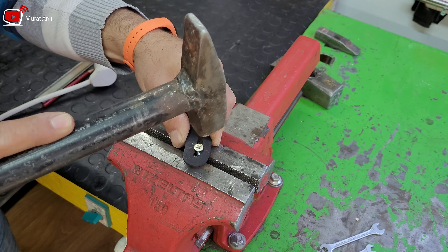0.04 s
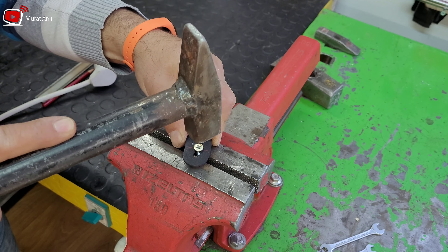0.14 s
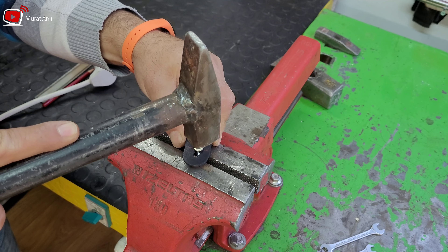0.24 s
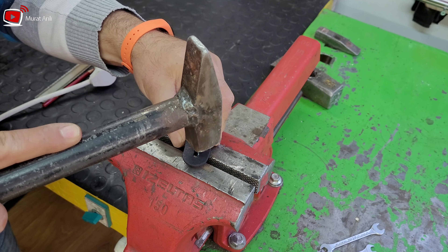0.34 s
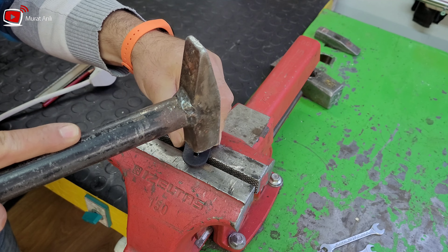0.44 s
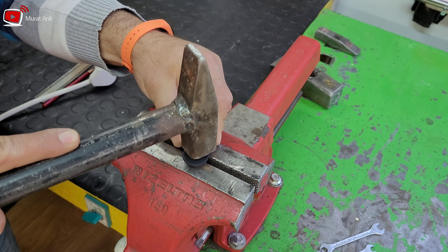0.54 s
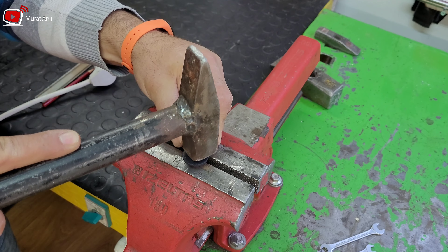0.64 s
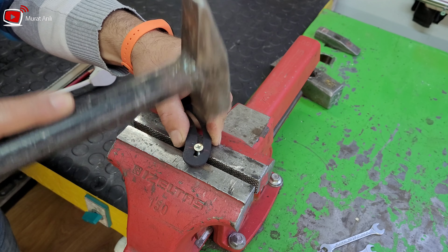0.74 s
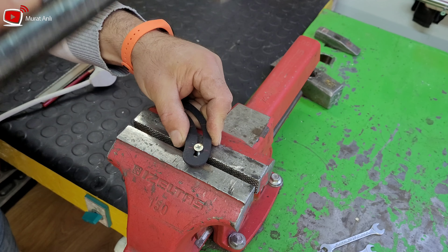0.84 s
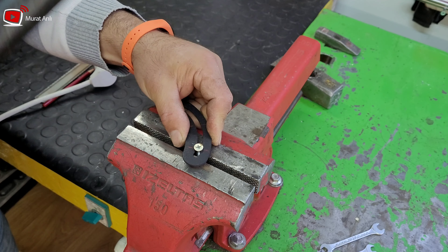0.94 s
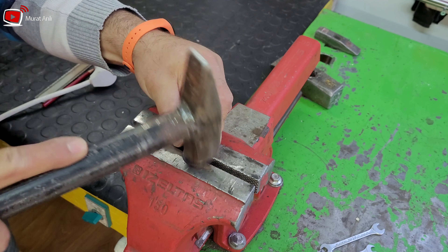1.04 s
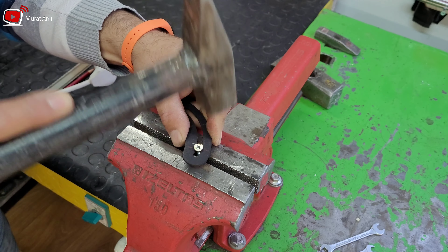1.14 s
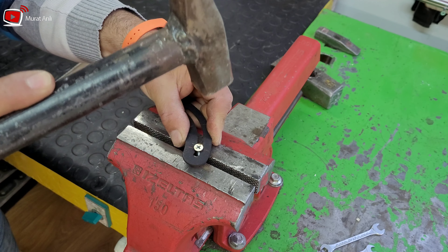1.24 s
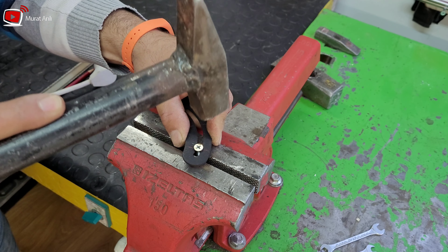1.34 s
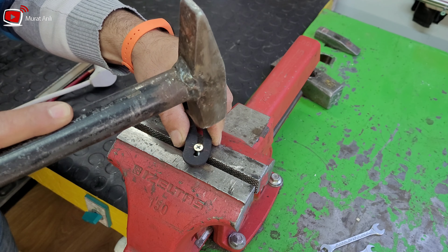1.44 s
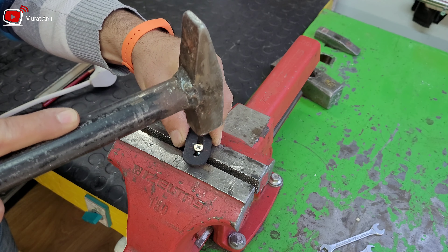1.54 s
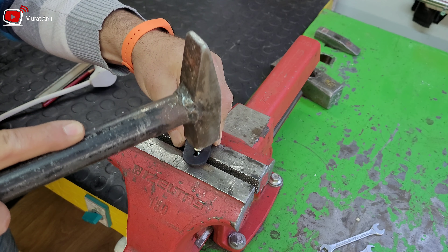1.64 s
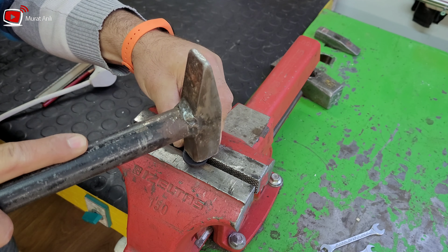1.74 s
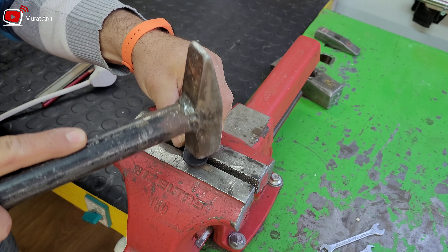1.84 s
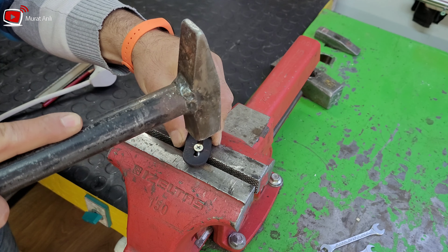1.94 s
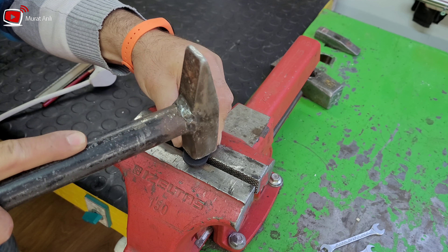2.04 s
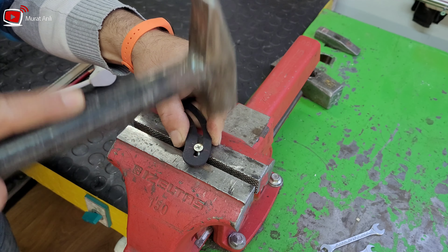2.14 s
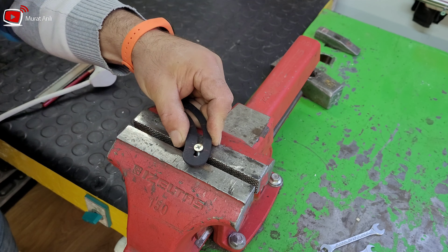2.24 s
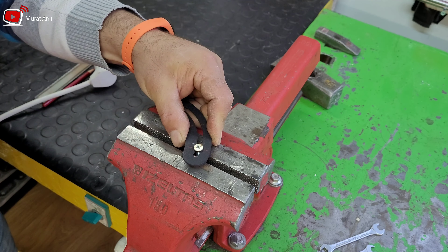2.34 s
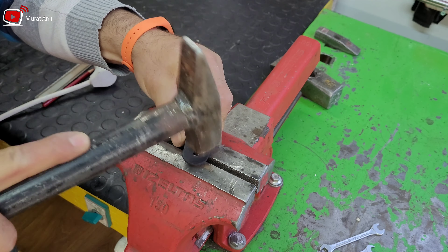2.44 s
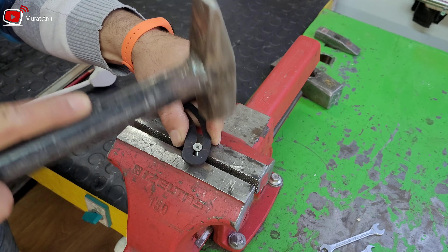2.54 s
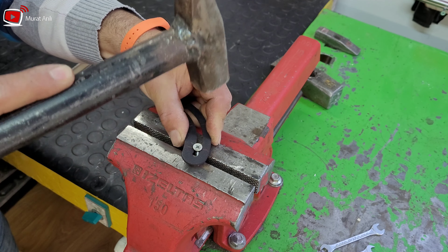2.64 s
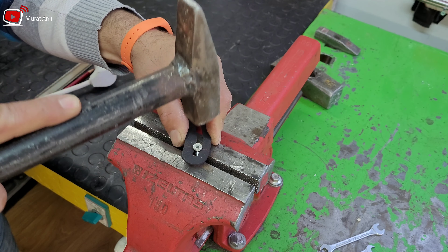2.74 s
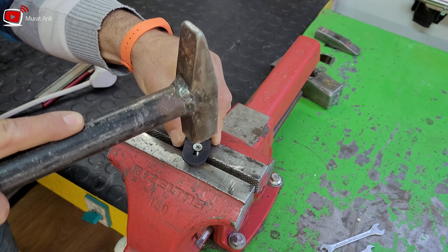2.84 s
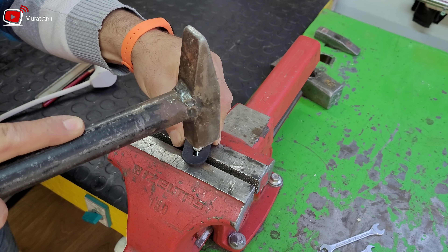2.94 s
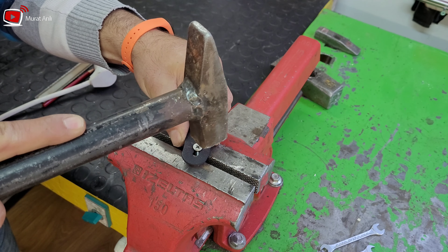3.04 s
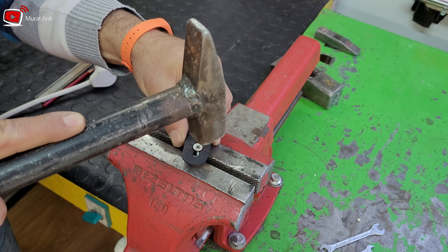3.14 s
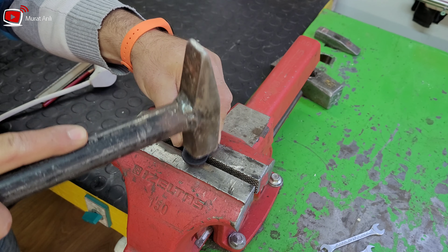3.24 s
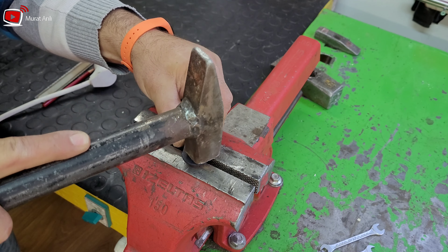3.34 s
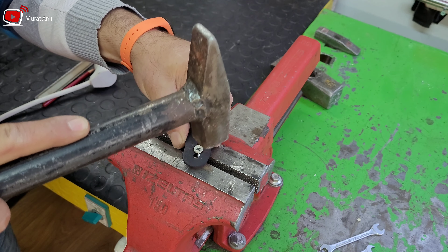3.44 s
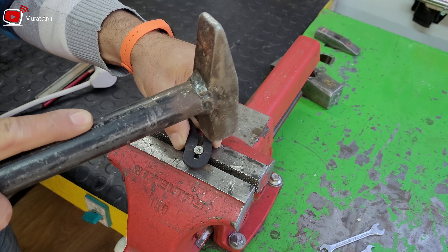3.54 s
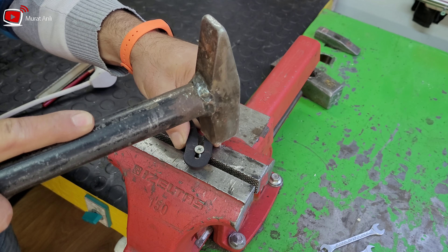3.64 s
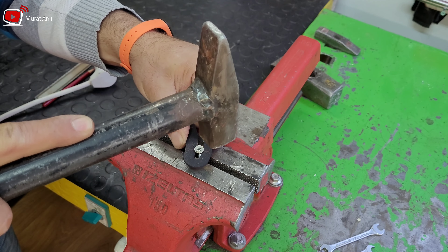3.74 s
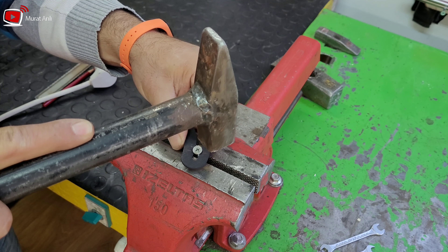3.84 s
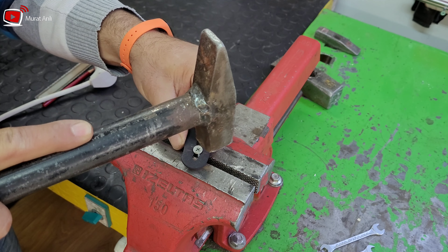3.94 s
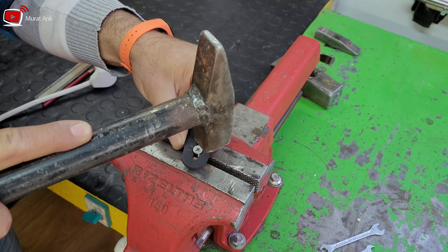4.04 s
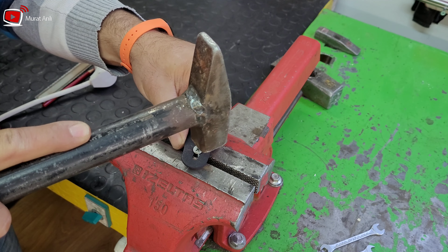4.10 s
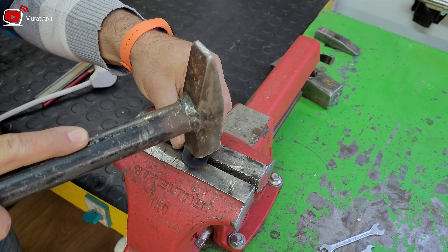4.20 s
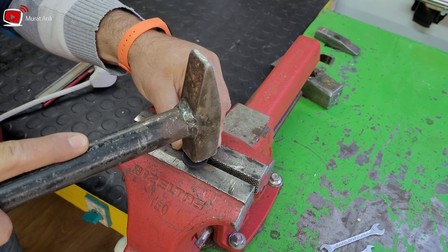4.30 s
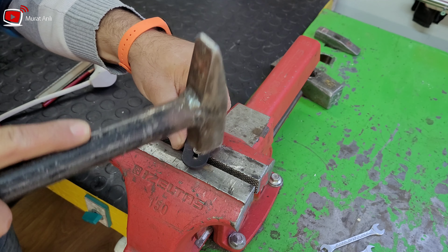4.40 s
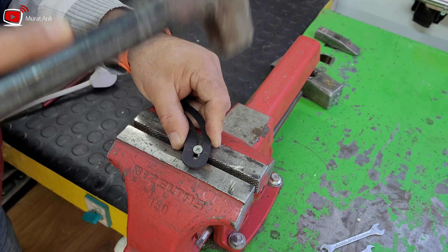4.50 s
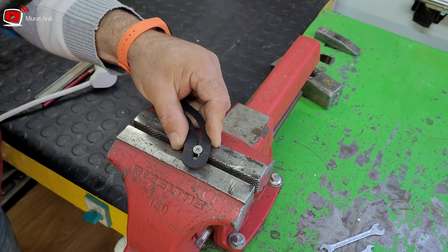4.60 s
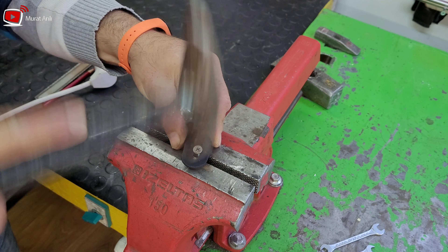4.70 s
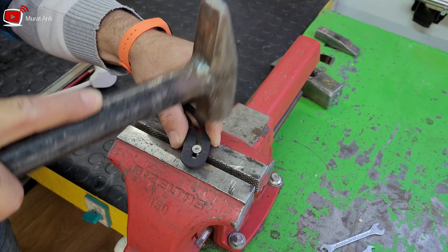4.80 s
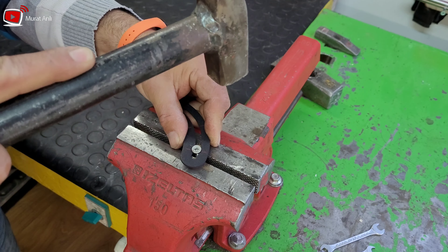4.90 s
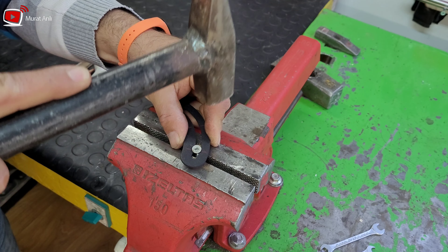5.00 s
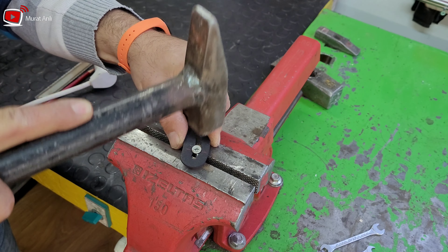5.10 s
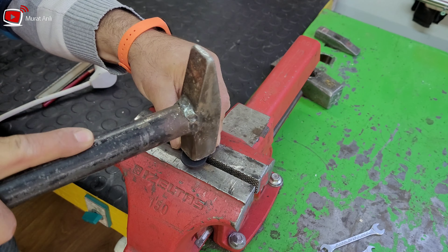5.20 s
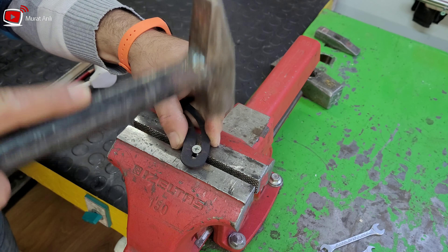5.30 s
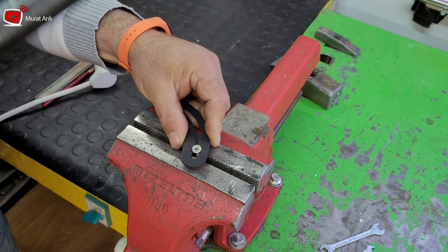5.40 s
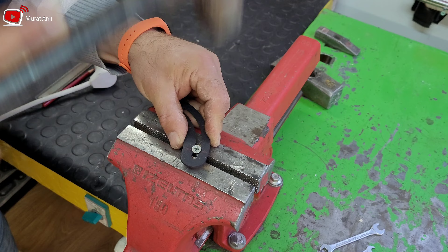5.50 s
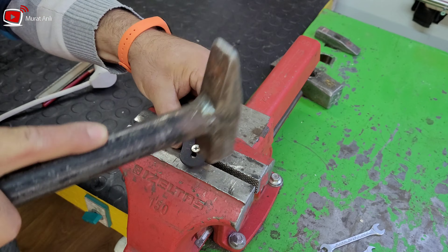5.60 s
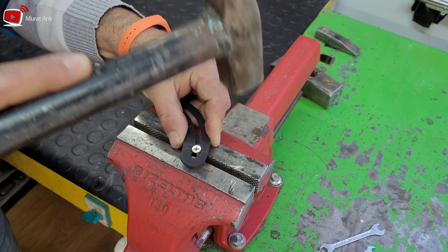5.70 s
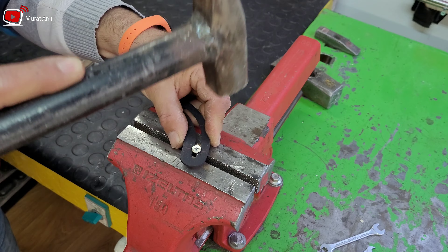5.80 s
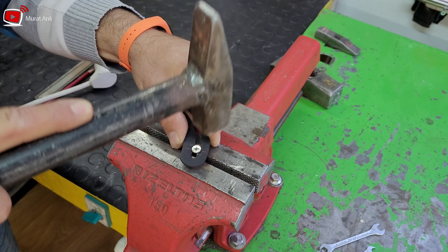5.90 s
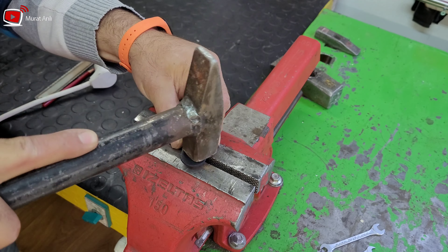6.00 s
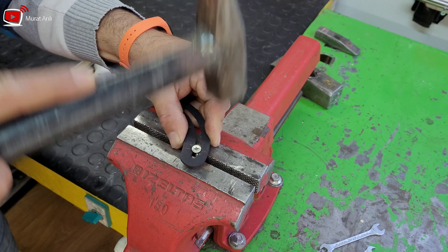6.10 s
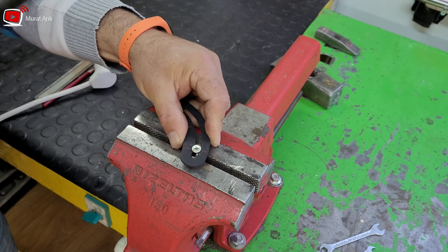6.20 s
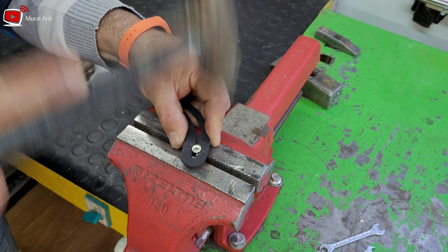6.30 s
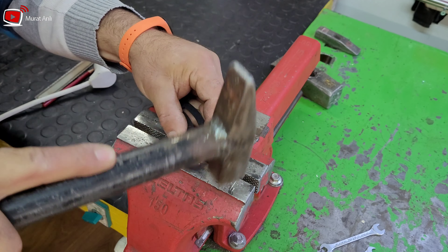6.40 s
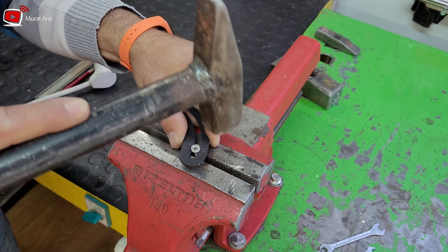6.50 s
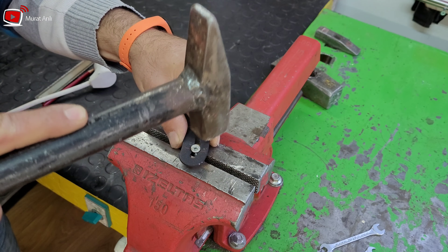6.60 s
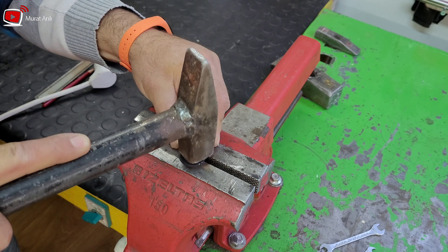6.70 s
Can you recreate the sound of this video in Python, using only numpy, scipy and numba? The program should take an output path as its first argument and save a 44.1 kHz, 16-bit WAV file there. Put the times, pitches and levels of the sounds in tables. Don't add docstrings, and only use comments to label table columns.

```python
import sys
import numpy as np
from scipy import signal
from scipy.fft import rfft, irfft
from scipy.io import wavfile
from scipy.ndimage import uniform_filter1d, minimum_filter1d
from numba import njit

SR = 44100
rng = np.random.default_rng(int(sys.argv[2]) if len(sys.argv) > 2 else 0)


def volts(x):
    e = np.asarray(x, float) / 20
    return 10 ** e


def wav_record(signal):
    frames = np.transpose(np.atleast_2d(signal))
    bounded = np.clip(frames, -1, 1)
    quanta = np.round(bounded * 32767).astype(np.int16)
    wavfile.write(sys.argv[1], SR, quanta)


N = 297675
FREQS = np.fft.rfftfreq(N, 1 / SR)
TIME = np.arange(N) / SR

# start_s, strength_db, extra_into_vise_db, extra_brightness_db, extra_onto_sheet_db
BLOWS = [(0.655, -43, -0.7, -2.5, 5.5), (1.102, 11.5, -11.5, 0, -5), (1.803, -30.5, -1.5, -0.8, 9.5),
         (2.100, -12, -9.5, -2.8, 1.4825), (2.134, -27, 6.5, 0.8, 2.5), (2.513, 10.5, 3, -1.8, 6.5),
         (3.121, -69, -11, -27, 0), (3.346, -23.5, -2.5, 2, 11), (4.344, -33.5, -1.4164, 3, -6.5),
         (4.805, 13, 3.5, 1.5, -9.2), (5.258, -12, 1.5, -3.5, -10.5), (5.634, 12, 6.5, -1.5, 2.5),
         (6.067, -13.5, 9, 4.5, 2.0116), (6.418, 9, 11, -1, 9)]


def over_hz(table, hz, axis=1):
    rows = np.array(table, float)
    return np.interp(np.log(np.maximum(hz, 1)), np.log(rows[:, 0]), rows[:, axis])


def coloured(spectrum, channels=1):
    x = irfft(rfft(rng.standard_normal((channels, N))) * volts(over_hz(spectrum, FREQS)), N)
    return x / np.sqrt(np.mean(x ** 2))


def click(spectrum):
    cepstrum = irfft(np.log(volts(over_hz(spectrum, np.fft.rfftfreq(2048, 1 / SR)))))
    cepstrum[1:1024] *= 2
    cepstrum[1025:] = 0
    pulse = irfft(np.exp(rfft(cepstrum)))
    return pulse / np.sqrt(np.sum(pulse ** 2))


def fade(t60_s, s):
    return np.exp(-np.log(1000) * s / t60_s)


def envelope(start_s, attack_s, hold_s, t60_s, db):
    s = TIME - start_s
    return volts(db) * np.clip(s / attack_s, 0, 1) ** 2 * fade(t60_s, np.maximum(s - attack_s - hold_s, 0))


def add(track, start_s, x):
    i = int(start_s * SR)
    track[i:i + len(x)] += x[:N - i]


def ring(modes, push_s):
    s = np.arange(SR) / SR
    out = np.zeros(SR)
    for hz, db, t60_s in modes:
        level_shift_db, detune = rng.standard_normal(2) * [1.5, .0015]
        out += volts(db + level_shift_db) * fade(t60_s, s) * np.sin(2 * np.pi * hz * (1 + detune) * s)
    return out * (1 - np.exp(-s / push_s))


def answer(strength_db, extra_db, level_db, slope, share):
    return volts(level_db + slope * strength_db + share * extra_db)


def snap_gain(strength_db, bright_db):
    return answer(strength_db, bright_db, level_db=-5, slope=.82, share=0.62)


def background():
    # pitch_hz, level_db_rms
    hum_lines = [(102.3, -73.5), (199.2, -70), (226.1, -84.5), (301.5, -76.5), (376.8, -86.5),
                 (398.4, -80.5), (500.6, -84)]
    # freq_hz, density_db_per_hz
    rumble = [(20, -22.5), (40, -4), (70, -8.5), (105, -6.5), (160, -16), (220, 0.5), (330, -12.5),
              (520, -24), (620, -29.5), (800, -21.5), (1000, -34.5), (9000, -49), (16500, -43)]
    # time_s, level_db
    settle = [(0, 10), (.5, -6), (1.0, -1.06), (3.3, -1), (3.8, -5), (4.75, 4), (5.5, 11.5), (6.75, 9.5)]
    rumble_db = -61
    hum = np.zeros(N)
    for k, (hz, db) in enumerate(hum_lines):
        waver_db = 2 * uniform_filter1d(rng.standard_normal(N), SR // 10) * np.sqrt(SR // 10)
        hum += np.sqrt(2) * volts(db + waver_db) * np.sin(2 * np.pi * hz * TIME + k)
    mid, side = coloured(rumble, channels=2) * volts(rumble_db - 6.5)
    both = hum + mid + volts(-7) * side * np.array([[1], [-1]])
    return both * volts(np.interp(TIME, *np.transpose(settle)))


def workshop(build_s):
    # freq_hz, level_db, first_t60_s, late_t60_s, late_share_db
    shop = [(60.5, -1.5, 0.57, 0.51, -19.5), (205, -3, 0.63, 2.1, -22.5), (394, 3, 0.4, 1.1, -22.5),
            (554.5, 4, 0.36, 0.77, -21.5), (1292, 8, 0.43, 0.86, -25.5), (3050, 7.5, 0.47, 0.57, -24.5),
            (5120, 7, 0.39, 0.85, -28),
            (8000, 0, .44, .6, -28), (11000, 1.5, .37, .5, -28), (15500, -1, .27, .36, -24)]
    # freq_hz, likeness_0_to_1
    likeness = [(40, .75), (100, .93), (170, .96), (350, .8), (700, .5), (1500, .15), (3000, 0), (16000, 0)]
    bass_build_hz = 150
    size = int(1.5 * SR)
    s, hz = np.arange(size) / SR, np.fft.rfftfreq(size, 1 / SR)
    mid, side = rfft(rng.standard_normal((2, size)))
    out = np.zeros((2, size))
    for centre_hz in 40 * 2 ** np.arange(0, 9, 1 / 3):
        offset = np.clip(3 * np.log2(np.maximum(hz, 1) / centre_hz), -1, 1)
        band = np.cos(np.pi / 2 * offset) ** 2
        db, first_s, late_s, late_db = (over_hz(shop, centre_hz, axis=k) for k in range(1, 5))
        decay = fade(first_s, s) + volts(late_db) * fade(late_s, s)
        gather = (1 - np.exp(-s / build_s / (1 + bass_build_hz / centre_hz))) ** 2
        alike = over_hz(likeness, centre_hz)
        m = np.sqrt(1 + alike) * irfft(mid * band, size)
        d = np.sqrt(1 - alike) * irfft(side * band, size)
        out += volts(db) * decay * gather * np.array([m + d, m - d])
    return out


def far_bang():
    low = coloured([(60, -19), (150, 4.5), (500, 4), (1100, -10), (3000, -49)])[0]
    high = coloured([(400, -7.0), (1100, -0.5), (2200, -3.5), (4500, -7.5), (8000, -20.5), (9500, -30),
                     (16000, -32.5)])[0]
    rattle_s, rattle_attack_s = .066, .05
    scrape = TIME < rattle_s + rattle_attack_s / 2
    knock = envelope(.064, attack_s=.002, hold_s=0, t60_s=.1, db=-48.5)
    thud = envelope(.066, attack_s=.004, hold_s=.07, t60_s=.16, db=-52.5)
    rattle = envelope(rattle_s, rattle_attack_s, hold_s=.025, t60_s=.16, db=-47)
    return low * (volts(-65.5) * scrape + knock + thud) + high * (volts(-75) * scrape + rattle)


def finger_ticks():
    # start_s, level_db, pitch_hz
    ticks = [
        (1.0631, -62, 4000),
        (3.8991, -82, 8800),
    ]
    out = np.zeros(N)
    for t, db, hz in ticks:
        modes = [(.88 * hz, 0, .012), (hz, -6, .012), (1.15 * hz, -2, .012)]
        add(out, t, volts(db) * ring(modes, push_s=.0003))
    return out


def loose_spanner():
    # pitch_hz, level_db, t60_s
    spanner = [(2191, 0, .65), (2180, -4, .45), (2207, -8, .3)]
    # start_s, level_db
    jingles = [(0.655, -63.5), (1.102, -29.5), (2.100, -57.5), (2.514, -33.5), (4.805, -32.5),
               (5.257, -58.5), (5.634, -33), (6.066, -61), (6.418, -20)]
    out = np.zeros(N)
    for t, db in jingles:
        add(out, t, volts(db) * ring(spanner, push_s=0.0037))
    return out


def sheet_and_washer():
    # pitch_hz, level_db, t60_s
    sheet = [(1750, 0, .02), (1950, 0, .02), (2150, -4, .02)]
    # pitch_hz, level_db, t60_s
    washer = [(860, 0, .05), (690, -6, .04), (960, -2, .04), (1160, -5, .03)]
    out = np.zeros(N)
    for t, db, _, _, sheet_db in BLOWS:
        add(out, t, answer(db, sheet_db, -27.5, slope=.7, share=0.77) * ring(sheet, push_s=0.0028))
        add(out, t, answer(db, sheet_db, -21.5, slope=0.66, share=-.15) * ring(washer, push_s=0.0008))
    return out


def bench_thump():
    # pitch_hz, level_db, t60_s
    top = [(63.2, -4, 0.22), (95.6, -8.5, 0.4), (114.4, -5, .45), (145.5, -8.5, 0.73), (176.1, 2.5, 0.31),
           (244.4, -6, 0.67), (277, -6.5, 0.57), (295.7, -9, .4), (350.3, -5, 0.42), (436.2, -5, 0.36),
           (471, -5, 0.33), (638, -13, .15)]
    # pitch_hz, level_db, t60_s
    legs = [(61, 0, .42), (54, -5, .35)]
    full_sway_db = -11.5
    sway_rise = np.clip(np.arange(SR) / SR / .1, 0, 1) ** 2
    out = np.zeros(N)
    for t, db, vise_db, _, sheet_db in BLOWS:
        add(out, t, answer(db, vise_db, -24.5, slope=0.76, share=-.1) * ring(top, push_s=0.02))
        push_db = min(db, full_sway_db) - max(db, 0) / 4
        sway = answer(push_db, sheet_db, -10, slope=1.4, share=-.15)
        add(out, t, sway * ring(legs, push_s=.03) * sway_rise)
    return out


def steel_rings():
    # pitch_hz, level_db, t60_s
    jaw = [(1061, 0, .13), (1045, -9, .06), (678, -18, .06), (710, -18, .06), (860, -12, .07),
           (1507, -20, .05)]
    # pitch_hz, level_db, t60_s
    slide = [(2462, 0, .11), (2492, -3, .07), (5262, -23, .2)]
    # pitch_hz, level_db, t60_s
    head = [(12400, -1, .065), (15300, -3, .045), (8020, -6, .2)]
    # pitch_hz, level_db, t60_s
    face = [(11800, -1, 0.013), (10300, -2.5, .012), (13500, -4, .01)]
    # pitch_hz, level_db, t60_s
    peen = [(4760, 0, .16), (9930, -5, .05)]
    vise_damps_head = 0.28
    out = np.zeros(N)
    for t, db, vise_db, bright_db, sheet_db in BLOWS:
        head_db = bright_db - vise_damps_head * vise_db
        add(out, t, answer(db, vise_db, -11.5, slope=0.91, share=0.41) * ring(jaw, push_s=0.0016))
        add(out, t, answer(db, vise_db, -19, slope=0.93, share=1.2) * ring(slide, push_s=0.00033))
        add(out, t, answer(db, head_db, -15.5, slope=0.68, share=0.78) * ring(head, push_s=.0002))
        add(out, t, snap_gain(db, bright_db) * volts(-12) * ring(face, push_s=.0002))
        add(out, t, answer(db, sheet_db, -28.5, slope=0.68, share=-0.36) * ring(peen, push_s=.0002))
    return out


def hammer_contacts():
    # freq_hz, level_db
    dull_spectrum = [(60, -25.5), (200, 1), (600, 1), (1200, -7.5), (2500, -9), (4000, -10), (7000, -14.5)]
    # freq_hz, level_db
    snap_spectrum = [(1500, -36), (3500, -12), (6500, -3), (9000, -7), (13000, 2), (15500, -1),
                     (17000, -6.5)]
    crack, grind = np.zeros((2, N))
    grit, fizz = coloured(dull_spectrum)[0], coloured(snap_spectrum)[0]
    dull, bright = click(dull_spectrum), click(snap_spectrum)
    s = np.arange(SR // 10) / SR
    for t, db, _, bright_db, _ in BLOWS:
        snap = snap_gain(db, bright_db)
        i = int(t * SR)
        add(crack, t, volts(db + 8.5) * dull + snap * volts(4.5) * bright)
        add(grind, t, snap * volts(-0.5) * fade(0.004, s) * fizz[i:i + len(s)])
        add(grind, t, volts(db - 12.5) * fade(0.092, s) * grit[i:i + len(s)])
    return crack, grind


def scene():
    far = far_bang()
    ticks = finger_ticks()
    bench = bench_thump()
    steel = steel_rings() + loose_spanner()
    crack, grind = hammer_contacts()
    crack = crack + sheet_and_washer() + ticks
    chatter = grind + ticks
    sent = crack + volts(-12.5) * chatter + volts(-20) * steel + volts(-4.0) * bench + volts(-3.5) * far
    echo = signal.fftconvolve(sent[None], workshop(build_s=0.0055), axes=1)[:, :N]
    near = volts(-10.5) * crack + chatter + steel
    port_lag_s = 8e-5
    late = irfft(rfft(near) * np.exp(-2j * np.pi * FREQS * port_lag_s), N)
    direct = np.array([late * volts(1.46), near * volts(-2.75)])
    direct = direct + bench * volts(np.array([[-1.2], [1.2]])) + volts(3.5) * far
    return direct + volts(-32) * echo * volts(np.array([[-.5], [.5001]])) + background()


@njit
def follow(x, attack, release):
    e, out = 0., np.empty(len(x))
    for i in range(len(x)):
        e += (x[i] - e) * (attack if x[i] > e else release)
        out[i] = e
    return out


def limiter(dry):
    attack_s, release_s = .0002, 0.014
    ahead = -minimum_filter1d(-np.abs(dry).max(0), size=49)
    level = follow(ahead, 1 / (attack_s * SR), 1 / (release_s * SR))
    gain = np.minimum(1, volts(2.0) / (level + 1e-9))
    return np.tanh(0.59 * dry * gain) / 0.61


def top_cut(x):
    return signal.sosfilt(signal.butter(12, 16810, fs=SR, output="sos"), x)


def record(dry):
    response = volts(over_hz([(30, -5), (45, 1.5), (15600, -1.5), (15800, -27.5), (16800, -37.0),
                            (17200, -65.5)], FREQS))
    mix = irfft(rfft(limiter(dry)) * response, N)
    return top_cut(mix)


dry = scene()
out = record(dry)
wav_record(out)
```